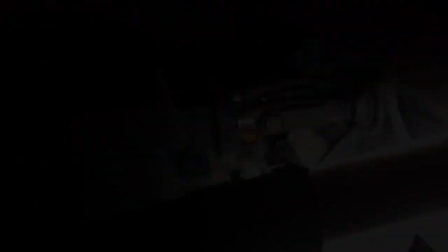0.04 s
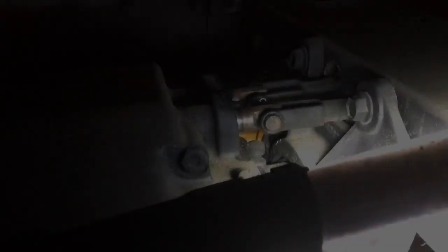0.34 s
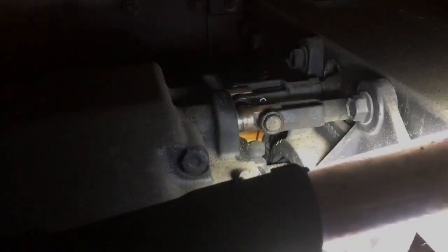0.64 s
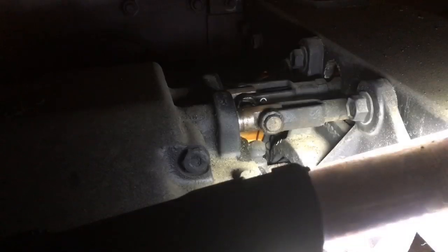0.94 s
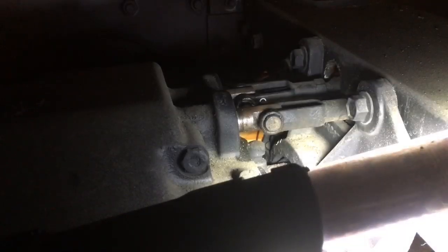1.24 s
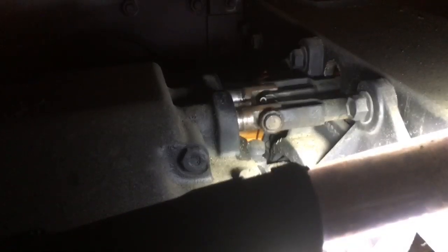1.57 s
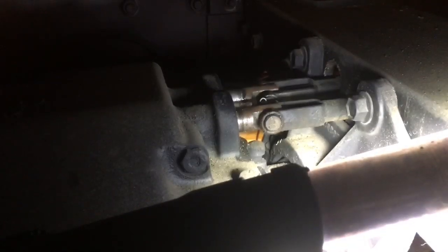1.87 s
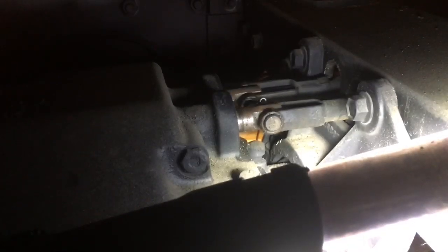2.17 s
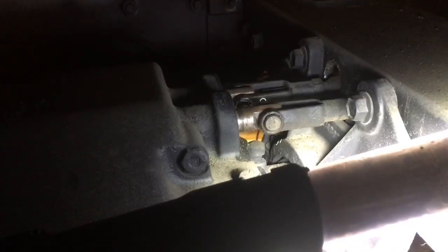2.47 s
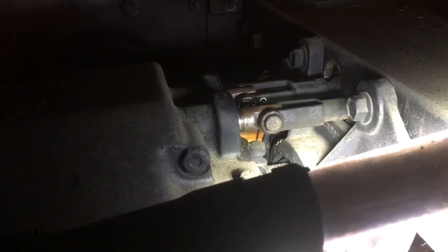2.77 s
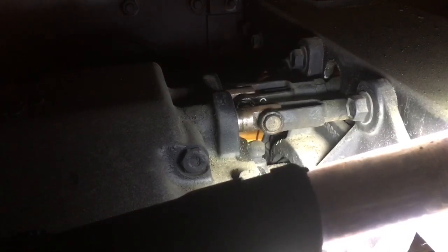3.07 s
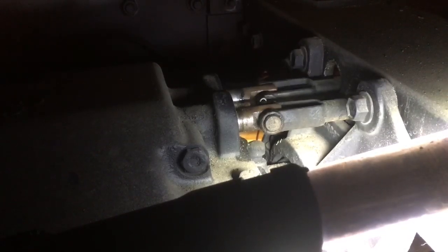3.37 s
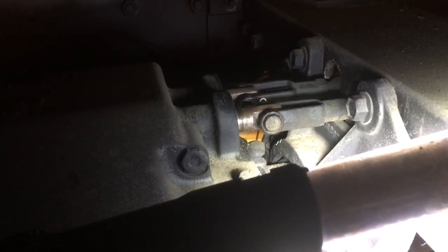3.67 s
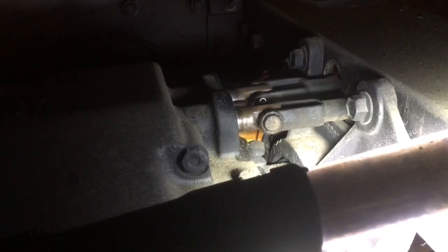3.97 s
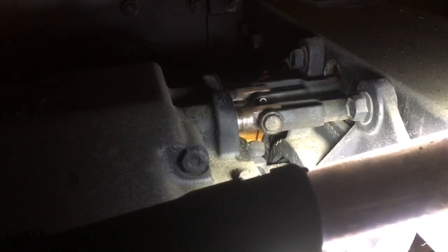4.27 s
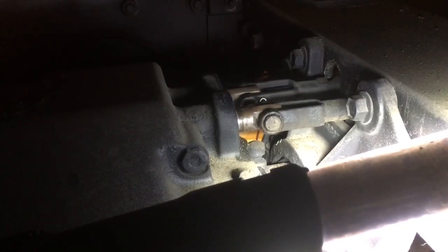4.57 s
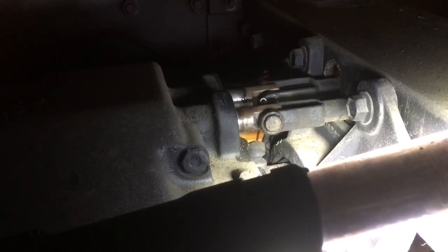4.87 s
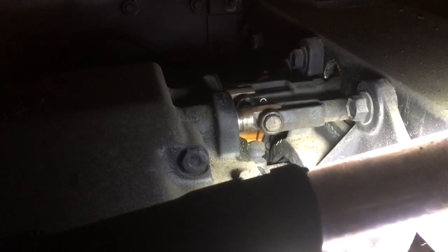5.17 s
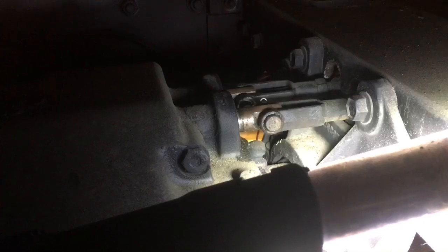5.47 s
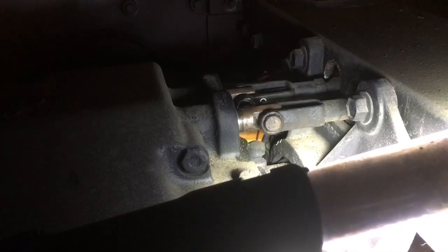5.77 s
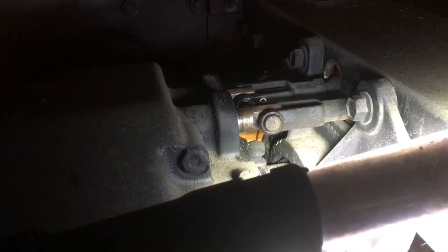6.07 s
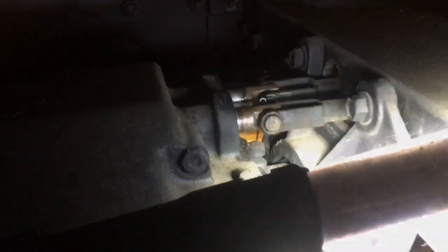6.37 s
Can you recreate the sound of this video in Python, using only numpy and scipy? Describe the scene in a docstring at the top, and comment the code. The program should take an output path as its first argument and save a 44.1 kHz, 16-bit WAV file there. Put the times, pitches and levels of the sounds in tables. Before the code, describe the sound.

Metal shift rods are worked back and forth under a truck in a quiet garage, heard up close as rapid, irregular clanks and rattles. After a few light ticks, a hard clank with a heavy gearbox clunk lands at 0.4 seconds, trailed by smaller knocks. A loud rattling cluster hits around 1.4 seconds and a single sharp clank at 2.1, followed by softer ticks and clinks. From about 3.2 to 5.2 seconds the linkage clatters almost continuously, with hard blows, quick rebounds and brief scrapes. Lighter ringing clinks follow from 5.6 seconds, then a final loud cluster with a thud comes at about 6.4. Each blow rings briefly in the housing and leaves a low boom in the chassis, and the hardest ones distort slightly. A faint rumble swells with the knocking, and a very thin hiss comes and goes.

```python
"""Shift rods and their clevis joints are worked back and forth under a truck in a garage, heard up close.
The rods slam into their stops and rebound; each blow rings the rods and the gearbox housing.
Loose pins tick, loaded rods stick and slip with a scrape, and a rod running home lands a heavy clunk.
The chassis booms afterwards, over a faint rumble, a thin hiss and the still air of the garage.
The hardest clanks overload into soft clipping."""
import sys
import numpy as np
from scipy import signal
from scipy.fft import rfft, irfft, next_fast_len
from scipy.io import wavfile

SR = 44100
rng = np.random.default_rng(int(sys.argv[2]) if len(sys.argv) > 2 else 0)


def generate_wav(signal):
    """Clip the signal to [-1, 1] and save it as 16-bit WAV at the path in sys.argv[1]."""
    frames = np.transpose(np.atleast_2d(signal))
    scaled = np.clip(frames, -1, 1) * 32767
    pcm = np.round(scaled).astype(np.int16)
    wavfile.write(sys.argv[1], SR, pcm)


N = 288179

# blows in the linkage: (time [s], clank level [dB], housing body re clank [dB], bright edge re clank [dB])
BLOWS = [(.002, -33.5, 15, -12), (0.146, -40, 4, -14), (.164, -36.5, -7, -26), (.178, -35.5, -16, -7),
         (.274, -43.5, 7, -15), (.361, -5.5, -9, -10.5), (.435, -22.5, -2, -10), (.463, -33, -10, -5.5),
         (.494, -26, 3.5, -32), (0.513, -35.5, -11, 10), (.541, -20, -1, -38), (.561, -20.5, 1, -9),
         (.771, -35, 8.5, -4), (.796, -21, 0.5, -7.5), (.82, -22, -2.5, -6), (0.845, -16, -5, -8),
         (0.856, -34, 6, 5), (.899, -41.5, -5, 11.5), (1.052, -60.5, -4, 5.5), (1.155, -46.5, -10, -4),
         (1.173, -31, 5, -30), (1.225, -33, -3, -6), (1.279, -38, -1.5, -5.5), (1.32, -33.5, -6, -8),
         (1.36, -22.5, 6.5, -4), (1.42, -5.5, -3.5, -10.5), (1.436, -6, -7, -4.5), (1.448, -8, -2, -4),
         (1.464, -10.5, -7, -5.5), (1.481, -14, -1.5, -10.5), (1.571, -35.5, 4, -8.5),
         (1.705, -41.5, 5.5, -2.5), (1.731, -24, -5.5, -13.5), (1.752, -39, 12.5, -2),
         (1.894, -38.5, -1, -19.5), (1.953, -41, -9, -21), (1.986, -46, -16, -1.5), (2.009, -37, 10.5, -13),
         (2.026, -54, 23, 3), (2.079, -6.5, -5, -13.5), (2.164, -28, -11, -10), (2.203, -50, 0, 12.5),
         (2.225, -31.5, -0.5, -15), (2.33, -27, -4.5, 9), (2.392, -28, -0.5, -4), (2.601, -43, 13, -21),
         (2.635, -34, -5, -6), (2.68, -41.5, 17.5, -20), (2.725, -25.5, 2.5, -1), (2.792, -32, 0.5, -3.5),
         (3.024, -22.5, 3.5, -21), (3.048, -28.5, -13, -11.5), (3.103, -31, -0.5, -12),
         (3.186, -20, 3.5, -9), (3.222, -7.5, -2.5, -7), (3.251, -8.5, -7, -5.5), (3.271, -7.5, -0.5, -6),
         (3.293, -12, -4.5, -8), (3.392, -30, 5, -5.5), (3.449, -27, 0.5, -8), (3.52, -9.5, -2, -5.5),
         (3.606, -27.5, -3, -8.5), (3.631, -30, 6.5, -48), (3.653, -35, 5, 8.5), (3.731, -30.5, -1.5, -3.5),
         (3.768, -10.5, -2.5, -12.5), (3.832, -15.5, -12, -6), (3.847, -18.5, -2.5, 1.5),
         (3.873, -12.5, -0.5, -10), (3.968, -30, 6.5, -9), (3.979, -36.5, 12, -2), (4.016, -18, 3, -11.5),
         (4.027, -16.5, -8, -3), (4.052, -9, -2.5, -10), (4.09, -25, -9, -5), (4.124, -25, 2, -6.5),
         (4.164, -30.5, 5, 3), (4.261, -31.5, 9, -4.5), (4.301, -11, -4, -6.5), (4.364, -18.5, 0, -9),
         (4.382, -18.5, -6, 1.5), (4.403, -9.5, -2, -12), (4.502, -27.5, 4.5, -11.5), (4.543, -22, 5, -7.5),
         (4.555, -17, -9, -4), (4.578, -11.5, -6.5, -15), (4.588, -22, 7.5, -0.5), (4.613, -23, -20, -8),
         (4.646, -21.5, -1.5, -5), (4.682, -29.5, 2.5, 3), (4.761, -39, 8, -6), (4.789, -30, 6.5, -5.5),
         (4.831, -11.5, -1.5, -7.5), (4.893, -25, -1, -6.5), (4.917, -21, 0, 1.5), (4.946, -13, -.5, -12),
         (5.047, -31, 7, -6), (5.085, -23.5, 4, -7.5), (5.101, -13, -7.5, -7), (5.127, -8, -1.5, -8),
         (5.192, -23.5, 1, -5.5), (5.24, -25.5, -22, 5.5), (5.291, -33, 5, 2.5), (5.34, -29.5, 4.5, -4.5),
         (5.359, -36, 13.5, -4), (5.389, -25.5, 3, -1.5), (5.64, -25, 2, -11), (5.66, -26.5, -8, -11),
         (5.712, -36, -11, -18), (5.892, -29.5, 5.5, -2), (5.915, -31, 9.5, -21), (5.956, -35, -1, -8.5),
         (6.09, -23, 2.5, -13.5), (6.115, -24, -3.5, -9.5), (6.278, -32.5, 12, -0.5), (6.309, -24, 9, -7.5),
         (6.334, -8, -1, -8.5), (6.357, -5, -4.5, -5.5), (6.379, -8, 4, -7), (6.4, -11.5, -2.5, -8.5),
         (6.516, -35.5, 5, -7.5)]
# modes of gearbox housing and linkage: (frequency [Hz], energy share [dB], t60 [s])
HOUSING_MODES = [(346.5, -0.5, 0.084), (409.8, -3.5, 0.091), (568.3, 0.5, 0.17), (667.8, 2.5, 0.1),
                 (720.6, -5, 0.18), (875, 2.5, .17), (1160, -3.5, 0.12), (1460, 0.5, 0.1),
                 (1568, -3, 0.091), (1750, -1, 0.12), (2150, -5, 0.11), (2338, 0, 0.078), (2386, -7, 0.12),
                 (2496, -3, 0.085), (3130, -23.5, 0.088), (3216, -20, 0.11), (3350, -7.5, 0.063),
                 (3530, -16, 0.05), (4530, -22.5, .05), (5390, -19, 0.076), (6160, -17.5, 0.018),
                 (8200, -33.5, .03), (9800, -18, .025)]
# thicket of weaker modes and near reflections: (frequency [Hz], level [dB])
THICKET_COLOUR = [(130, -7.5), (220, 1), (340, 4.5), (480, -4.5), (650, 5), (800, -2.5), (1250, 4),
                  (1650, -4), (1900, -0.5), (2400, -5.5), (2800, -11.5), (5000, -26), (9800, -22),
                  (10400, -26), (12000, -24), (16000, -37)]
# ring time of that thicket: (frequency [Hz], t60 [s])
THICKET_DECAY = [(100, 1), (260, 0.32), (700, 0.19), (1840, 0.12), (4850, 0.11), (12800, 0.038)]
# punch of a rod against its stop: (frequency [Hz], level [dB])
PUNCH_COLOUR = [(300, -27.5), (700, 9.5), (1150, -14), (1650, 9.5), (1950, -8), (2400, 1), (3200, -33),
                (8000, -46), (16000, -56)]
# snap of a dry pin: (frequency [Hz], level [dB])
SNAP_COLOUR = [(800, -29), (2500, 7), (3600, -1.5), (5500, -0.5), (7500, -3.5), (9700, -3.5), (10400, -15),
               (12000, -10), (16000, -14)]
# scrape of a sliding rod: (frequency [Hz], level [dB])
GRIND_COLOUR = [(200, -3), (650, 8.5), (1600, 6.5), (2500, -0.5), (3500, 3), (6500, -12), (9700, -26),
                (10500, -22), (16000, -35.5)]
# a rod runs home and shakes the whole gearbox: (time [s], level [dB])
CLUNKS = [(.385, -10), (1.452, -16.5), (2.097, -30.5), (3.257, -28), (6.359, -26)]
# thud of the gearbox: (frequency [Hz], level [dB])
CLUNK_COLOUR = [(25, -16.5), (55, 1), (80, -5), (115, 4), (160, -7.5), (230, -1.5), (340, -6.5), (520, -6),
                (700, -11), (1100, -25.5), (4000, -73)]
# a loosened rod drops back and rings freely: (time [s], level [dB])
ROD_CLINKS = [(1.733, -40), (3.025, -25.5), (3.187, -25), (5.643, -22), (5.894, -37.5), (6.094, -21),
              (6.281, -31)]
# modes of that rod: (frequency [Hz], energy share [dB], t60 [s])
ROD_MODES = [(1435, 3, .13), (1980, -9, .07), (2130, -9, .1), (2420, -2, .15), (2850, -7, .08),
             (3490, -8, .08), (3685, -5, .09), (4150, -15, .06), (6300, -15, .025), (7100, -16, .025)]
# a light tap on a spring clip: (time [s], level [dB])
CLIP_PINGS = [(2.794, -33)]
CLIP_MODES = [(1560, 0, .26), (1744, -13, .16), (3130, -19, .1)]
# boom of chassis and garage: (frequency [Hz], level [dB])
BOOM_COLOUR = [(22, -16.5), (40, -9.5), (52, 4), (66, 4.5), (85, -4), (115, 4.5), (150, -7), (200, -1.5),
               (300, -17.5), (1000, -28.5), (3000, -39.5), (8000, -56.5)]
# undamped parts nearby that sing on: (frequency [Hz], energy share [dB], t60 [s])
SINGING_MODES = [(692, 3.5, 1.), (955, -7, 2.), (988, -6, 2.8), (1120, -4, 1), (1572, -4, .9),
                 (1760, -4, 1.1), (2360, -4, 1.), (2410, -8, .9), (3080, -12, .8)]
# rumble of the truck: (frequency [Hz], level [dB])
RUMBLE_COLOUR = [(20, -27), (38, -7), (53, 3.5), (70, -14.5), (90, 0.5), (115, -6), (160, -5), (220, -10.5),
                 (400, -17), (1000, -25), (3000, -63.5)]
# a rod is eased along with a faint rub: (start [s], end [s])
RUBS = [(1.08, 1.1), (1.55, 2.05), (2.88, 3.02)]
# a thin hiss comes and goes: (start [s], end [s])
HISSES = [(0, 0.72), (2.2, 2.83), (2.93, 3.02), (5.35, 5.8)]
# tone of that hiss: (frequency [Hz], level [dB])
HISS_COLOUR = [(500, -20), (2500, -0.5), (5000, -4), (9500, -7), (16000, -9.5)]
# room tone of the still garage, also the tone of the rubs: (frequency [Hz], level [dB])
AIR_COLOUR = [(30, -13), (200, -8.5), (500, -31), (1000, -14.5), (2000, -9.5), (4000, -23), (9000, -40),
              (16000, -40)]


def linkage(hits, clank_db=-2, edge_db=-0.67, top_db=-3.5, crisp_db=-28,
            graze_s=.0025, graze_db=-21, chatter_s=.012, chatter_db=-22):
    """Each blow grazes, then lands on one of a few contact points; the slack joint chatters after it."""
    t = np.arange(2 ** 14) / SR
    shared_grain = rng.standard_normal(len(t))
    points = [contact_ring(t, shared_grain) for _ in range(13)]
    chatter_gaps = chatter_s * rng.exponential(size=(len(hits), 2))
    out = np.zeros(N)
    for k, (s, db, body, edge) in enumerate(hits):
        # quiet blows sound duller, with less treble above 7.5 kHz
        top = edge + top_db + min(db + edge - crisp_db, 0)
        gains = undb(db + np.array([body, clank_db, edge + edge_db, top]))
        add(out, s, gains @ points[k % len(points)])
        # graze and chatter are too light to move the housing, so they skip the body band
        graze = gains[1:] @ points[(k - 1) % len(points)][1:]
        add(out, s - graze_s, undb(graze_db) * graze)
        for bounce, lag in enumerate(np.cumsum(chatter_gaps[k]), 1):
            chatter = gains[1:] @ points[(k + bounce) % len(points)][1:]
            add(out, s + lag, undb(chatter_db) / bounce * chatter)
    return out


def contact_ring(t, shared_grain, likeness=0.6, crack_db=-12, housing_db=-2, parts_db=-9,
                 seat_s=0.0013, crossovers_hz=(780, 3200, 7500)):
    """The ring of one contact point in four bands: housing body, clank, bright edge and its top."""
    grain = likeness * shared_grain + np.sqrt(1 - likeness ** 2) * rng.standard_normal(len(t))
    crack = burst(t, [(500, -0.5), (1600, 4), (4000, -12), (9500, -14.5), (16000, -21.5)], t60=.02)
    ring = thicket(t, grain) + undb(crack_db) * crack
    ring += undb(housing_db) * modes(t, HOUSING_MODES, scatter_db=8)
    ring += undb(parts_db) * small_parts(t)
    ring *= attack(t, seat_s)  # greasy faces take a moment to seat
    lowpasses = [signal.butter(4, hz, fs=SR, output="sos") for hz in crossovers_hz]
    body, to_mid, to_high = (signal.sosfiltfilt(sos, ring, padtype=None) for sos in lowpasses)
    edge_and_top = np.array([to_high - to_mid, ring - to_high]) / np.linalg.norm(ring - to_mid)
    return np.vstack([unit(body), unit(to_mid - body), edge_and_top])


def thicket(t, grain, build_cycles=3.16):
    """Countless close modes in half-octave bands; the lows bloom later and ring longer."""
    spectrum = rfft(colour(grain, THICKET_COLOUR))
    half_octaves = 2 * np.log2(np.maximum(np.arange(len(spectrum)) * SR / len(t), 1))
    out = 0
    for step in range(14, 29):
        hz = 2 ** (step / 2)
        t60 = lookup(THICKET_DECAY, hz)
        band = irfft(spectrum * np.maximum(1 - abs(half_octaves - step), 0), len(t))
        out += band * fade(t, t60) * attack(t, build_cycles / hz) / np.sqrt(t60)
    return unit(out)


def small_parts(t, lowest_hz=1100, t60=0.044, db_per_octave=-4, count=12):
    """Pins and washers at one joint add a few short partials of their own."""
    octaves = rng.uniform(0, np.log2(6), count)
    partials = [(lowest_hz * 2 ** octave, db_per_octave * octave, t60) for octave in octaves]
    return modes(t, partials, scatter_db=-2.5)


def rebounds(lag_s=.018, drop_db=13, hard_db=-7, flight_s=.024, body_db=-4, brighter_db=12):
    """A hard blow with room to fly throws the rod back against its pin: a weaker, brighter contact."""
    gaps = np.diff([blow[0] for blow in BLOWS], append=np.inf)
    hits = []
    for (s, db, _, edge), gap in zip(BLOWS, gaps):
        # soft blows hardly rebound, nor do those crowded by the next one
        loss_db = drop_db + max(hard_db - db, 0) + 20 * (gap < flight_s)
        hits.append((s + lag_s, db - loss_db, body_db, min(edge, 0) + brighter_db))
    return hits


def end_stops(hits, punch_db=-2, housing_db=-7, full_db=-15, slack_s=0.0015):
    """Hard blows take up the slack and reach the stop: a short punch, and the housing rings hollow."""
    t = np.arange(2 ** 13) / SR
    rings = [modes(t, HOUSING_MODES, scatter_db=2) for _ in range(7)]
    out = np.zeros(N)
    for k, (s, db, body, _) in enumerate(hits):
        reach_db = min(db - full_db, 0) / 2  # soft blows barely get there
        punch = undb(punch_db) * burst(t, PUNCH_COLOUR, t60=0.033)
        hollow = undb(housing_db + body) * rings[k % len(rings)]
        add(out, s + slack_s, undb(db + reach_db) * (punch + hollow))
    return out


def clevis_pins(hits, snap_db=-3):
    """The brightest contacts are dry pins snapping over: a direct tick that dies at once."""
    t = np.arange(2 ** 11) / SR
    out = np.zeros(N)
    for s, db, _, edge in hits:
        dull_db = min(edge, 0)  # dull contacts hardly snap
        add(out, s, undb(db + edge + snap_db + dull_db) * burst(t, SNAP_COLOUR, t60=.018))
    return out


def grinding(grind_db=-37, slips_per_s=450, spread_db=5, lean=0.56, stroke_s=.04, release_db_per_s=700):
    """Between blows the loaded rod sticks and slips, each slip a tiny click into the metal."""
    t = np.arange(2 ** 12) / SR
    out = np.zeros(N)
    for (start, first_db, *_), (end, next_db, *_) in zip(BLOWS, BLOWS[1:]):
        # the load lies between the two blows, and falls away if they are more than a stroke apart
        load_db = first_db + lean * (next_db - first_db)
        load_db -= release_db_per_s * max(end - start - stroke_s, 0)
        chance, size = rng.random((2, len(t)))[:, :max(int((end - start) * SR), 2)]
        slipping = chance < max(slips_per_s / SR, chance.min() * 2)  # at least one slip
        slips = slipping * undb(-spread_db * np.log(1 - size))
        slips = unit(slips) * np.sqrt(len(slips))
        scrape = signal.fftconvolve(slips, burst(t, GRIND_COLOUR, t60=0.048))
        add(out, start, undb(load_db + grind_db) * scrape)
    return out


def gearbox_clunks():
    """The heavy gearbox takes a moment to move on its mounts, then thuds."""
    t = np.arange(SR // 2) / SR
    out = np.zeros(N)
    for s, db in CLUNKS:
        add(out, s, undb(db) * burst(t, CLUNK_COLOUR, t60=0.16, attack_s=0.011))
    return out


def struck_part(strikes, part_modes):
    """A loose rod or clip is struck and rings freely in its own modes."""
    t = np.arange(SR // 2) / SR
    out = np.zeros(N)
    for s, db in strikes:
        add(out, s, undb(db) * modes(t, part_modes, scatter_db=5.5, detune=.001, build_cycles=3.6))
    return out


def chassis_boom(hits, boom_db=-8, singing_db=-30):
    """Each blow spreads slowly into the chassis and the garage, and leaves nearby parts singing."""
    t = np.arange(SR * 3 // 2) / SR
    pushes, knocks = np.zeros((2, N))
    for s, db, body, _ in hits:
        add(pushes, s, undb([db + body + boom_db]))
        add(knocks, s, undb([db + singing_db]))
    boom = signal.fftconvolve(pushes, burst(t, BOOM_COLOUR, t60=1.2, attack_s=0.01))
    singing = signal.fftconvolve(knocks, modes(t, SINGING_MODES, scatter_db=-2))
    return (boom + singing)[:N]


def truck_rumble(loaded_db=-37.5, rest_db=-46.5, lag_s=.05, rise_db_per_s=252.5, fall_db_per_s=53):
    """The truck rumbles under load: it swells around each blow and relaxes, so quick work keeps it up."""
    t = np.arange(0, N, 2 ** 7) / SR
    since_peak = t[:, None] - np.transpose(BLOWS)[0] - lag_s
    swells_db = np.minimum(rise_db_per_s * since_peak, -fall_db_per_s * since_peak)
    effort_db = np.interp(np.arange(N) / SR, t, swells_db.max(axis=1))
    return np.hypot(undb(loaded_db + effort_db), undb(rest_db)) * noise(RUMBLE_COLOUR, N)


def garage_bed(rub_db=-55.5, hiss_db=-65, air_db=-63.5):
    """Faint rod rubs and a thin hiss come and go over the still air of the garage."""
    rubbing = undb(rub_db) * gate(RUBS, ramp_s=.08) * noise(AIR_COLOUR, N)
    hiss = undb(hiss_db) * gate(HISSES, ramp_s=0.014) * noise(HISS_COLOUR, N)
    air = undb(air_db) * noise(AIR_COLOUR, N)
    return rubbing + hiss + air


def modes(t, table, scatter_db, detune=0.0039, build_cycles=3.3):
    """Ringing partials; their mix and pitch vary a little at random."""
    draws = rng.standard_normal((len(table), 3))
    out = 0
    for (hz, db, t60), (level_jitter, pitch_jitter, phase) in zip(table, draws):
        wave = np.sin(2 * np.pi * (hz * (1 + detune * pitch_jitter) * t + phase))
        partial = unit(wave * fade(t, t60) * attack(t, build_cycles / hz))
        out += undb(db + scatter_db * level_jitter) * partial
    return unit(out)


def burst(t, spectrum, t60, attack_s=0):
    """A decaying hit of coloured noise with an energy of one."""
    onset = attack(t, attack_s) if attack_s else 1
    return unit(noise(spectrum, len(t)) * fade(t, t60) * onset)


def noise(spectrum, size):
    """Coloured noise with an rms of one."""
    x = colour(rng.standard_normal(size), spectrum)
    return x / x.std()


def colour(x, spectrum):
    """EQ a sound with a curve of (frequency [Hz], level [dB])."""
    size = next_fast_len(len(x))
    hz = np.arange(size // 2 + 1) * SR / size
    return irfft(rfft(x, size) * undb(lookup(spectrum, hz)), size)[:len(x)]


def lookup(table, hz):
    """Read a curve on a log-frequency axis."""
    points, values = np.transpose(table)
    return np.interp(np.log(np.maximum(hz, 1)), np.log(points), values)


def attack(t, rise_s):
    """Exponential rise to full level."""
    return 1 - np.exp(-t / rise_s)


def fade(t, t60):
    """Exponential decay, 60 dB down at t60."""
    return np.exp(-np.log(1000) * t / t60)


def gate(spans, ramp_s):
    """Gain that opens for each (start [s], end [s])."""
    t = np.arange(N) / SR
    return sum(np.clip(np.minimum(t - start, end - t) / ramp_s + .5, 0, 1) for start, end in spans)


def add(out, s, sound):
    """Mix a sound in at s seconds."""
    start = max(int(s * SR), 0)
    out[start:start + len(sound)] += sound[:max(len(out) - start, 0)]


def undb(db):
    """Decibels to gain."""
    return 10 ** (np.asarray(db) / 20)


def unit(x):
    """Scale to an energy of one."""
    return x / np.sqrt(np.sum(x ** 2, axis=-1, keepdims=True))


def scene(near_db=26):
    """The linkage up front, an arm's length away, over the rumble and the room tone; mono."""
    hits = list(BLOWS) + rebounds()
    metal = linkage(hits) + end_stops(hits) + clevis_pins(hits) + grinding() + gearbox_clunks()
    metal += struck_part(ROD_CLINKS, ROD_MODES) + struck_part(CLIP_PINGS, CLIP_MODES)
    metal += chassis_boom(hits)
    return (undb(near_db) * metal + truck_rumble() + garage_bed())[None]


def record(dry, knee=3.4, top_hz=16000):
    """Overload rounds off the hardest peaks, then a steep low-pass cuts the top."""
    rounded = dry / (1 + abs(dry) ** knee) ** (1 / knee)
    return signal.sosfilt(signal.ellip(10, .2, 70, top_hz, fs=SR, output="sos"), rounded)


dry = scene()
out = record(dry)
generate_wav(out)
```